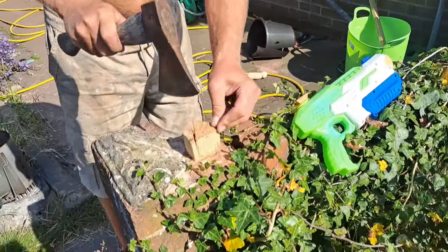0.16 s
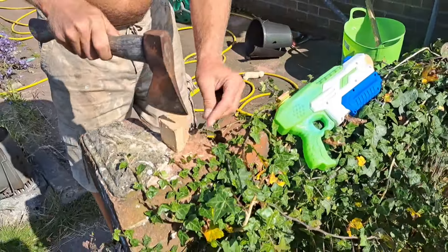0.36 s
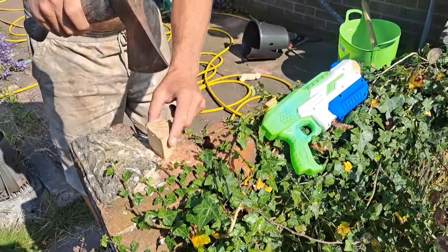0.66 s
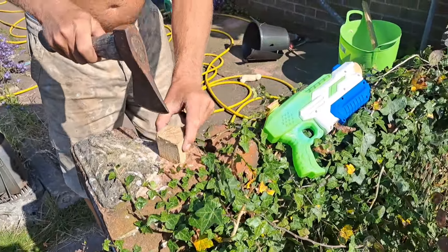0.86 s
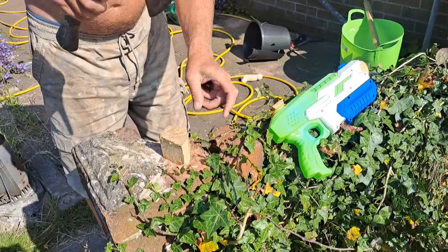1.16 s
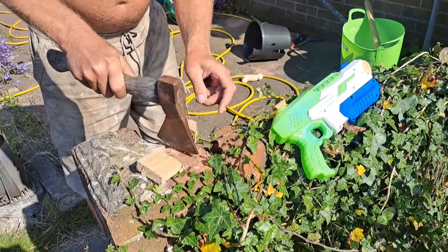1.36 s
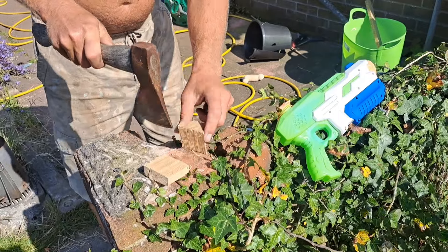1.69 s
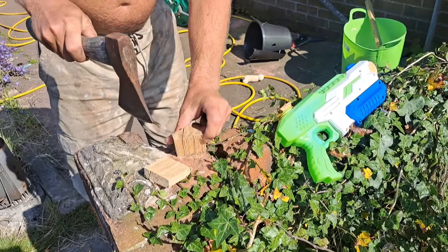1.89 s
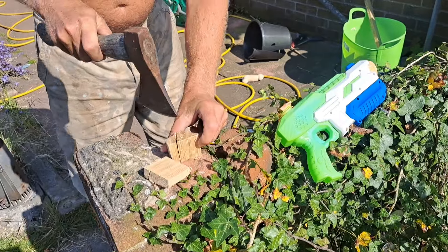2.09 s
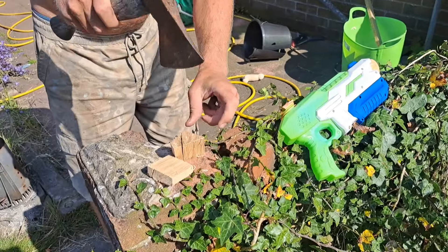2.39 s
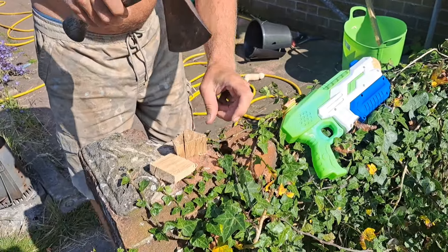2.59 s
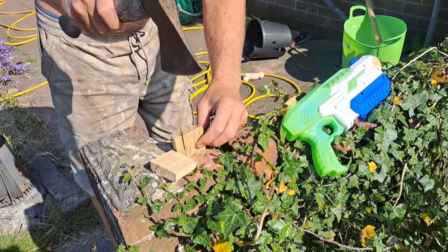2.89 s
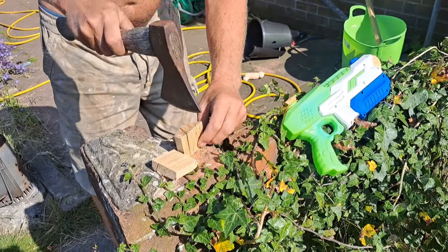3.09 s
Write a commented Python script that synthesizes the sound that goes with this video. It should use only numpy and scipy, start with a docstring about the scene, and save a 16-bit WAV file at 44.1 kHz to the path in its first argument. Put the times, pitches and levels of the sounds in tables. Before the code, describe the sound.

A hatchet chops a small piece of wood once: a sharp crack, then a knock on the block with a faint steel ring, and a dull drop. Quiet wood handling before and after, outdoors, close stereo microphone, wind buffeting.

```python
"""Splitting kindling in a garden

A hatchet cracks through a small piece of wood, lands on the block and rings; the split piece drops.
Each contact is a click and a burst of splintering that excites the resonances of the wood.
The steel is decaying or swelling sines; fingers turn and set the wood as knocks, snags and friction noise.
Behind it wind buffets the microphone as lumpy low noise, a far bird trills in falling whistles,
and leaves and distance hiss softly."""
import sys
import numpy as np
from scipy import signal
from scipy.fft import rfft, irfft
from scipy.io import wavfile

SR = 44100
rng = np.random.default_rng(int(sys.argv[2]) if len(sys.argv) > 2 else 0)


def waveform_to_disk(signal):
    """Save audio, clipped to [-1, 1], as 16-bit WAV at the path in sys.argv[1]."""
    frames = np.transpose(np.atleast_2d(signal))
    scaled = np.clip(frames, -1, 1) * 32767
    samples = np.round(scaled).astype(np.int16)
    wavfile.write(sys.argv[1], SR, samples)


N = 143325
T = np.arange(N) / SR   # s

# Contact levels are relative: the resonances they excite set the final loudness.
# the blade bites and the wood cracks: [t/s, level/dB, length/s]
BITE = (1.3247, -0.64, 0.0026)
# fibres tear as the blade goes down: [t/s, level/dB, length/s]
FIBRE_TEARS = [(1.329, -17.5, 0.072), (1.3375, -20.5, 0.0031), (1.342, -15.5, .019)]
# the blade just touches the wood: [t/s, level/dB, length/s]
BLADE_TAPS = [(.079, -36.5, .003), (2.927, -31, .002), (2.958, -33.5, .008)]
# resonances of the cracking wood: [f/Hz, width/Hz, level/dB]
CRACK_MODES = [(387.7, 150, -10), (570, 52, -10.5), (820, 110, -5), (1130, 300, -2), (1610, 290, 1.5),
               (1850, 180, -9), (2530, 240, 0), (3310, 340, 1), (3780, 260, 4), (4100, 300, 0),
               (5130, 600, -7), (6900, 100, -11.5), (7510, 500, -16), (12700, 1200, -19)]
# the blade lands on the block and chatters: [t/s, level/dB, length/s]
LANDINGS = [(1.3626, -1.5, 0.004), (1.3678, -16.5, 0.0017), (1.3765, -23.5, 0.0078), (1.385, -28, 0.0025),
            (1.397, -33, .006)]
# resonances of the block: [f/Hz, width/Hz, level/dB]
BLOCK_MODES = [(234, 90, -6), (368, 28, 5), (490, 130, -4), (612, 100, 6), (1020, 170, 8),
               (1130, 130, -1.5), (1390, 90, -0.5), (1650, 30, -1.5), (2000, 85, -2.5), (2530, 130, 4),
               (3180, 140, 3), (3830, 610, -3.5), (4470, 250, -7.5), (6265, 300, -11)]
# modes of the steel head: [f/Hz, phase between the ports/rad, its turning as the head moves/(rad/s)]
STEEL_MODES = [(5181, 1.2, 12), (9771, .9, 0)]
# each mode swells and dips, and sinks when the split piece drops; one list a mode: [t/s, level/dB]
STEEL_LEVELS = [
    [(1.361, -61.5), (1.366, -31), (1.395, -42.5), (1.428, -54), (1.46, -56), (1.499, -51), (1.505, -62),
     (1.56, -62)],
    [(1.363, -56), (1.382, -40), (1.402, -35), (1.45, -45), (1.505, -60), (1.56, -66.5), (1.6, -97)],
]
# a light touch leaves the head ringing faintly: [t/s, level/dB]
STEEL_PING = (0.067, -70)
# light wooden knocks: [t/s, level/dB, length/s, hardness of the contact as treble limit f/Hz]
KNOCKS = [(.204, -32, 0.012, 2470), (0.2596, -23.5, .002, 5800), (0.27, -33, 0.0047, 3000),
          (.672, -45, 0.0036, 1500), (1.5017, -18.5, 0.0021, 1650), (1.541, -32.5, 0.0021, 2500),
          (1.7, -37, 0.0069, 2000), (1.858, -28, 0.0022, 2070), (1.879, -33, 0.0047, 1200),
          (2.099, -34, .002, 2000), (2.893, -33, 0.0036, 965), (2.964, -34, 0.0059, 3000)]
# resonances of the small piece: [f/Hz, width/Hz, level/dB]
PIECE_MODES = [(507, 230, -7), (790, 84, 4.5), (1080, 91, -5), (1345, 180, 6.5), (1770, 140, -14.5),
               (2670, 400, -7), (3440, 180, -3), (5930, 1600, -30)]
# edges and splinters catch: [t/s, level/dB, length/s]
SNAGS = [(.079, -46, 0.005), (.172, -45.5, 0.0058), (.201, -48.5, 0.009), (.384, -52.5, 0.0031),
         (.785, -51, 0.005), (1.684, -48, 0.014), (1.918, -47.5, .002), (1.934, -41, .003),
         (1.967, -41, 0.0073), (2.207, -54.5, 0.00089), (3.005, -40.5, 0.0066), (3.023, -43, 0.0053)]
# resonances of an edge: [f/Hz, width/Hz, level/dB]
EDGE_MODES = [(3080, 260, -12), (5960, 870, 2), (7040, 740, -10.5), (9900, 1500, -7.5)]
# the wood slides on the block: [t/s, length/s, level/dB]
SLIDES = [(0, 0.041, -64.5), (0.027, 0.1, -66.5), (0.162, 0.13, -61.5), (0.39, 0.21, -79.5),
          (0.724, 0.11, -66.5), (1.87, 0.038, -55.5), (1.911, 0.079, -62.5), (2.928, 0.03, -52),
          (2.963, 0.095, -56)]
# spectrum of the sliding: [f/Hz, level/dB]
SLIDE_COLOUR = [(500, -30), (1400, 2), (2400, 5), (4600, 3), (5800, 7.5), (8800, 0), (10400, 10),
                (11800, 6), (13100, 8), (16000, -6)]
# a soft, duller rub as the wood is turned: [t/s at its peak, length/s, level/dB]
RUB = (0.46, 0.12, -60)
# spectrum of the rub: [f/Hz, level/dB]
RUB_COLOUR = [(700, -35), (1500, -7), (2200, 1.5), (3000, -8.5), (6000, -14), (15000, -12)]
# how far the right port lags the left: [f/Hz, phase/rad]
PORT_PHASE = [(0, -1), (750, 0.38), (1150, 0.5), (1600, 1.7), (2600, 0.54), (3700, 2), (5000, 4),
              (16000, 7)]
# garden reflections: [f/Hz, level/dB, decay time by 60 dB/s]
GARDEN = [(150, -16.5, .4), (400, -6.5, 0.12), (1000, -11.5, 0.14), (2510, -23.5, 0.51), (5000, -18, 0.15),
          (10000, -17, 0.33), (16000, -22, 0.32)]
# the far bird's notes: [t/s, level/dB]
CHIRPS = [(1.045, -60), (1.107, -57.5), (1.165, -57), (1.222, -57), (1.285, -58), (1.486, -62.5),
          (1.555, -61), (1.623, -63), (1.769, -64)]
# wind on the more exposed right port, relative: [t/s, level/dB]
WIND_RIGHT = [(0.0, -56), (0.11, -50.5), (0.35, -59.5), (.55, -52), (.68, -44), (.86, -45.5), (1.04, -39.5),
              (1.11, -50), (1.16, -35), (1.28, -50.5), (1.37, -41.5), (1.8, -51.5), (2.1, -55),
              (2.55, -54.5), (2.67, -40), (2.86, -49), (2.93, -42), (2.97, -41), (3.0, -34), (3.06, -46),
              (3.25, -45)]
# wind on the sheltered left port, calm between gusts, relative: [t/s, level/dB]
WIND_LEFT = [(0, -65.5), (.11, -55), (.18, -60.5), (.53, -82), (.68, -53.5), (.87, -50), (.93, -38.5),
             (1.06, -42.5), (1.12, -43.5), (1.16, -49), (1.22, -51), (1.31, -86.5), (1.36, -40.5),
             (1.6, -51), (1.95, -56.5), (2.06, -64), (2.58, -74), (2.63, -48.5), (2.85, -45.5),
             (2.92, -36.5), (3.08, -47.5), (3.25, -44.5)]
# spectrum of the wind: [f/Hz, level/dB]
WIND_COLOUR = [(20, -14.5), (40, -6.5), (62, 3), (90, -3.5), (130, -2), (200, -11), (300, -15), (500, -30),
               (900, -43.5), (2000, -71.5)]
# single buffets of wind: [t/s, left level/dB, right level/dB, length/s]
BUFFETS = [(.105, -38.5, -44, 0.017), (0.48, -43, -38.5, 0.0086), (0.677, -46, -47, 0.075),
           (0.828, -30, -30, 0.012), (.947, -35, -36, 0.016), (1.07, -25, -23.5, 0.021),
           (1.14, -29, -24, 0.013), (1.403, -32, -32, 0.0085), (1.509, -34.5, -29.5, 0.022),
           (1.797, -34, -32, 0.01), (2.143, -44.5, -41, 0.022), (2.339, -39.5, -34, .016),
           (2.924, -24.5, -22, 0.033), (3, -25, -31.5, 0.02), (3.108, -29.5, -22.5, 0.0068)]
# loudness of the outdoor hiss: [t/s, level/dB]
AIR = [(0, -61), (.33, -62.5), (.62, -62.5), (1.0, -61), (1.22, -57), (1.6, -60.5), (1.9, -62.5),
       (2.25, -64), (2.55, -64.5), (2.88, -59), (3.08, -56), (3.25, -55.5)]
# spectrum of the hiss: [f/Hz, level/dB]
AIR_COLOUR = [(100, 4.5), (500, 5), (1000, -2), (2000, -7), (3400, -10.5), (5000, -12), (7500, -13),
              (9000, -25.5), (13000, -18), (16000, -24.5)]

DROP_S, DROP_THUMP_DB, DROP_CONTACT_HZ = 1.503, -11.5, 1010   # the block answers the split piece
TAP_CONTACT_HZ, LANDING_CONTACT_HZ = 3530, 4560   # treble limits of the softer contacts
PING_T60_S = 0.69
SLIDE_EDGE_S, SLIDE_GRAINS_PER_S, SLIDE_GRAIN_DB = 0.013, 2500, 4
NEAR_DB, NEAR_T60_S, FIRST_ECHO_S = -13, 0.08, 0.0031
SCATTER_WIDTH_HZ = 920   # most that scattering adds to the width of a resonance
TREBLE_LIMIT_HZ = 13000   # for the wood and the bird
CHIRP_S, CHIRP_TOP_HZ, CHIRP_END_HZ = 0.02, 3550, 2850   # the pitches before the spread
CHIRP_SPREAD, BIRD_ECHO_DB = 0.04, 4   # each note is off pitch by up to this fraction
WIND_DB, WIND_LUMP_DB, WIND_LUMPS_PER_S = 7, 3, 25
BUFFET_TILT_DB = -0.2   # per octave: a buffet is a touch darker than the rumble
AIR_LIKENESS = 0.29   # how alike the hiss is at the two ports, 0 to 1
CEILING, CUTOFF_HZ = 0.82, 16000


def blade_force():
    """The blade's hits on the wood: a hard bite, tearing fibres and softer taps."""
    cut = contacts([BITE], crackle=2.1) + contacts(FIBRE_TEARS, crackle=1.2)
    return cut + soft(contacts(BLADE_TAPS, crackle=1.0), TAP_CONTACT_HZ)


def block_force():
    """Blows on the block: the blade lands and chatters, then the split piece drops with a dull thump."""
    landing = soft(contacts(LANDINGS, crackle=2.7), LANDING_CONTACT_HZ)
    thump = contacts([(DROP_S, DROP_THUMP_DB, 0.004)], crackle=0.38)
    return landing + soft(thump, DROP_CONTACT_HZ)


def steel():
    """The head rings in pure modes after it lands; each reaches the two ports with its own phase."""
    out = np.zeros((2, N))
    for (hz, phase, turning), level in zip(STEEL_MODES, STEEL_LEVELS):
        start, end = level[0][0], level[-1][0]
        t = T - start
        ringing = (t > 0) & (T < end)
        port_phase = np.outer([0, 1], phase + turning * t)
        out += ringing * curve(level) * np.sin(2 * np.pi * hz * t + port_phase)
    s, db = STEEL_PING
    ping_hz = STEEL_MODES[1][0]
    ping = from_db(db) * np.sin(2 * np.pi * ping_hz * T) * decay(T, PING_T60_S)
    for port in out:
        add(port, s, ping)
    return out


def handling():
    """Knocks ring the small piece, duller for softer contacts; snags ring a thin edge."""
    knocks = sum(soft(contacts([row], crackle=1), hz) for *row, hz in KNOCKS)
    snags = contacts(SNAGS, crackle=3.15)
    return body(knocks, PIECE_MODES) + body(snags, EDGE_MODES)


def slides():
    """Friction is a run of tiny catches of uneven size that swells and fades while the wood is turned."""
    level = np.zeros(N)
    for s, length, db in SLIDES:
        to_nearer_end = np.minimum(T - s, s + length - T)
        level += from_db(db) * np.clip(to_nearer_end / SLIDE_EDGE_S + 0.5, 0, 1) ** 2
    unevenness = np.minimum(rng.exponential(1, N), 3) + 0.8 * drift(60)
    sizes = from_db(SLIDE_GRAIN_DB * unevenness)
    caught = rng.random(N) < SLIDE_GRAINS_PER_S / SR
    catches = caught * sizes * rng.standard_normal((2, N))
    return level * noise(SLIDE_COLOUR, catches)


def rub():
    """One smooth swell of friction noise."""
    s, length, db = RUB
    return from_db(db) * swell(s, length) * noise(RUB_COLOUR)


def bird():
    """A trill of short falling whistles, each at a slightly different pitch."""
    out = np.zeros(N)
    u = np.linspace(0, 1, int(CHIRP_S * SR))   # progress through a note
    for s, db in CHIRPS:
        glide = CHIRP_TOP_HZ + (CHIRP_END_HZ - CHIRP_TOP_HZ) * u
        hz = glide * (1 + CHIRP_SPREAD * rng.uniform(-1, 1))
        whistle = np.sin(2 * np.pi * np.cumsum(hz) / SR)
        add(out, s, from_db(db) * np.sin(np.pi * u) * whistle)
    return out


def wind():
    """Lumpy rumble, different at each port, with single buffets on top."""
    lumps = from_db(WIND_LUMP_DB * np.array([drift(WIND_LUMPS_PER_S), drift(WIND_LUMPS_PER_S)]))
    gusts = from_db(WIND_DB) * np.array([curve(WIND_LEFT), curve(WIND_RIGHT)])
    out = gusts * rms_one(noise(WIND_COLOUR) * lumps)
    eddies = noise([(hz, db + BUFFET_TILT_DB * np.log2(hz / 100)) for hz, db in WIND_COLOUR])
    for s, left_db, right_db, length in BUFFETS:
        shape = swell(s, length)
        puff = eddies * shape
        # each port's puff gets the energy of its envelope, so that the level holds
        puff *= np.linalg.norm(shape) / np.linalg.norm(puff, axis=1, keepdims=True)
        out += from_db([[left_db], [right_db]]) * puff
    return out


def air():
    """Soft hiss of leaves and distance, partly shared by the ports as a mid and side mix."""
    mid, side = noise(AIR_COLOUR)
    shared = np.sqrt(1 + AIR_LIKENESS) * mid
    opposed = np.sqrt(1 - AIR_LIKENESS) * side * np.array([[1], [-1]])
    return curve(AIR) * (shared + opposed) / np.sqrt(2)


def ports(x):
    """Direct sound at two ports: the right is phase-shifted, lagging over most of the range."""
    phase = np.interp(np.arange(N // 2 + 1) * SR / N, *np.transpose(PORT_PHASE))
    right = irfft(rfft(x) * np.exp(-1j * phase), N)
    return np.array([x, right])


def garden(x):
    """Quick scatter from things nearby, then a faint tail from the walls that dies band by band."""
    t = T[:SR // 2]
    hz, db, t60 = np.transpose(GARDEN)

    def dying(seconds):
        """Unrelated decaying noise for each port, silent until the first echo."""
        shape = decay(t, seconds) * (t > FIRST_ECHO_S)
        return rng.standard_normal((2, len(t))) * shape / np.linalg.norm(shape)

    response = from_db(NEAR_DB) * dying(NEAR_T60_S)
    edges = np.geomspace(100, 17000, 12)   # Hz
    for low, high in zip(edges, edges[1:]):
        centre = np.sqrt(low * high)
        band = signal.butter(2, [low, high], "band", fs=SR, output="sos")
        tail = signal.sosfilt(band, dying(np.interp(centre, hz, t60)))
        response += from_db(np.interp(centre, hz, db)) * tail
    return signal.fftconvolve(x[None], response, axes=1)[:, :N]


def contacts(rows, crackle):
    """Each contact is a sharp click and a short run of splintering, crackle times as strong."""
    out = np.zeros(N)
    for s, db, length in rows:
        run = rng.standard_normal(SR // 10)[:max(int(length * SR), 2)]
        run = crackle * run / np.linalg.norm(run)
        run[0] = 1   # the click
        add(out, s, from_db(db) * even(run))
    return out


def even(run, count=6):
    """Spread a short burst's energy evenly over all pitches, so that the wood alone colours it."""
    size, energy = len(run), np.linalg.norm(run)
    for _ in range(count):
        phase = np.angle(rfft(run, 2 * size))
        run = irfft(np.exp(1j * phase))[:size]
    return energy * run / np.linalg.norm(run)


def soft(force, hz):
    """A soft contact loses its treble: a gentle low-pass."""
    low_pass = signal.butter(2, min(hz, SR / 2 - 1), fs=SR, output="sos")
    return signal.sosfilt(low_pass, force + 1e-18)


def body(force, modes):
    """Heavily damped wood resonances in parallel; a wider one dies sooner."""
    out = 0
    for hz, width, db in modes:
        r = np.exp(-np.pi * width / SR)
        poles = [1, -2 * r * np.cos(2 * np.pi * hz / SR), r * r]
        gain = from_db(db) * (1 - r * r) / 2
        out = out + gain * signal.lfilter([1, 0, -1], poles, force + 1e-18)
    return from_db(11) * out


def scattered(force, modes):
    """What comes back from all around is less sharply pitched: wider resonances at equal energy."""
    wide = [(hz, width + SCATTER_WIDTH_HZ * hz / (hz + 500), db) for hz, width, db in modes]
    return rms_one(body(force, wide)) * np.std(body(force, modes))


def noise(colour, source=None):
    """Two unrelated noises, white unless a source is given, shaped by a spectrum of f/Hz, level/dB."""
    hz, db = np.transpose(colour)
    bins = np.maximum(np.arange(N // 2 + 1) * SR / N, 1)
    gain = from_db(np.interp(np.log(bins), np.log(hz), db))
    source = rng.standard_normal((2, N)) if source is None else source
    return rms_one(irfft(rfft(source) * gain, N))


def drift(rate):
    """Random wandering with an rms of one, through a given number of knots per second."""
    knots = rng.standard_normal(N)
    return rms_one(np.interp(T * rate, np.arange(N), knots))


def swell(s, length):
    """Bell-shaped envelope around a peak time, down to 1/e half a length away."""
    return np.exp(-(2 * (T - s) / length) ** 2)


def decay(t, t60):
    """Exponential decay that falls by 60 dB in t60 seconds."""
    return np.exp(-np.log(1000) * t / t60)


def curve(rows):
    """Gain over time from rows of t/s, level/dB."""
    return from_db(np.interp(T, *np.transpose(rows)))


def from_db(db):
    """Decibels to gain."""
    return 10 ** (np.asarray(db) / 20)


def rms_one(x):
    """Scale to unit rms."""
    return x / np.sqrt(np.mean(x ** 2) + 1e-20)


def add(track, s, sound):
    """Mix a sound in at a time in seconds."""
    i = max(int(s * SR), 0)
    track[i:i + len(sound)] += sound[:N - i]


def scene():
    """The chop, the handling around it and the garden."""
    blade, block = blade_force(), block_force()
    handled, song = handling(), bird()
    direct = body(blade, CRACK_MODES) + body(block, BLOCK_MODES) + handled + song
    sent = scattered(blade, CRACK_MODES) + scattered(block, BLOCK_MODES)
    sent = sent + handled + from_db(BIRD_ECHO_DB) * song
    placed = soft(ports(direct) + garden(sent), TREBLE_LIMIT_HZ)
    return placed + steel() + slides() + rub() + wind() + air()


def record(dry):
    """Peaks are rounded and the top is cut."""
    low_pass = signal.ellip(10, 0.1, 80, CUTOFF_HZ, fs=SR, output="sos")
    rounded = CEILING * np.tanh(dry / CEILING)
    return signal.sosfilt(low_pass, rounded)


dry = scene()
out = record(dry)
waveform_to_disk(out)
```